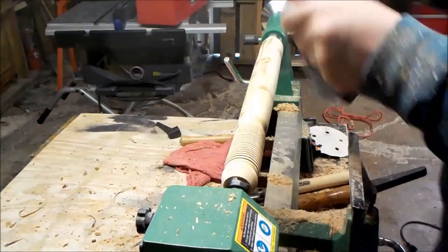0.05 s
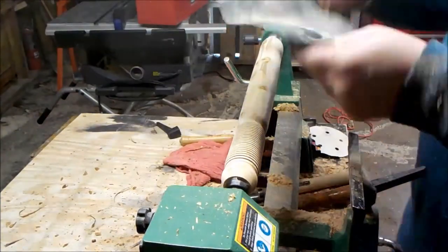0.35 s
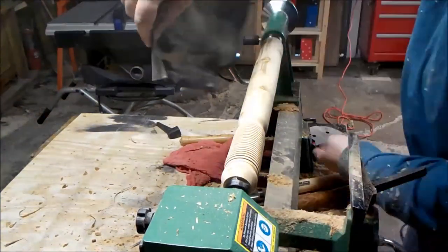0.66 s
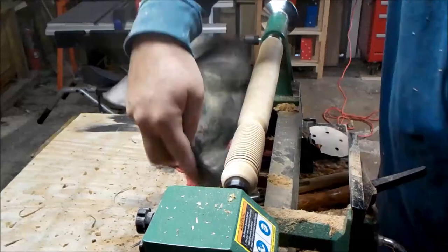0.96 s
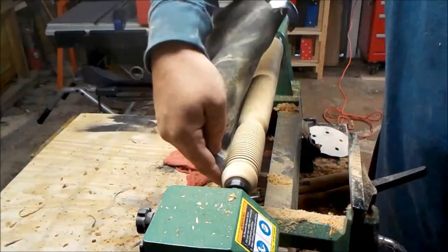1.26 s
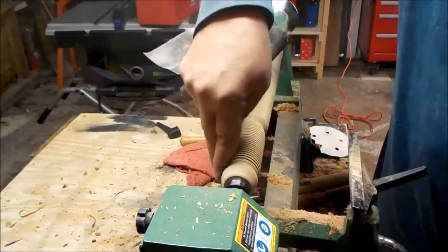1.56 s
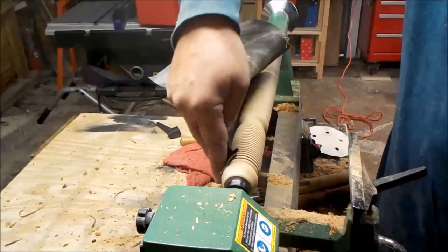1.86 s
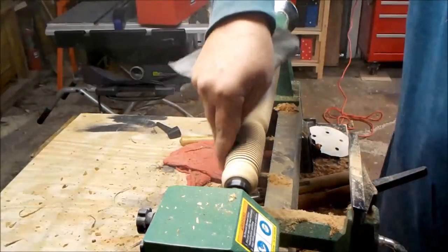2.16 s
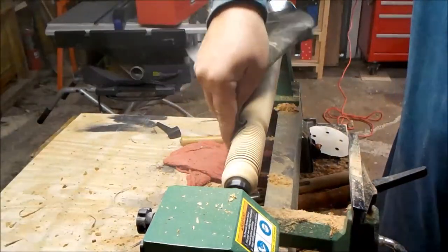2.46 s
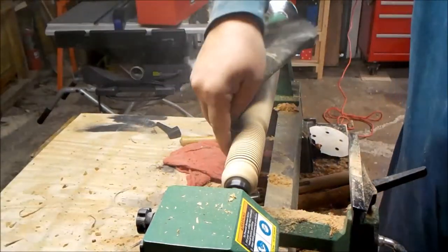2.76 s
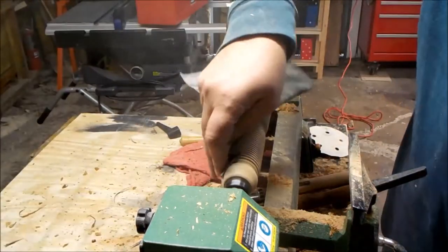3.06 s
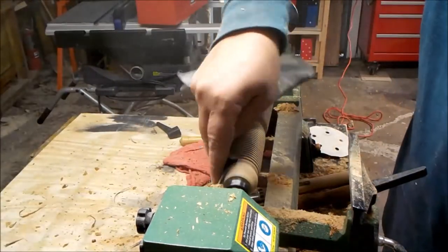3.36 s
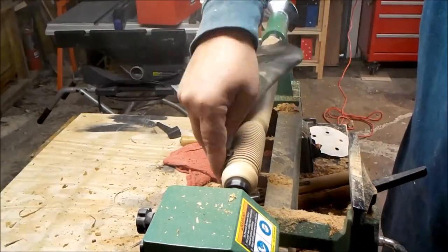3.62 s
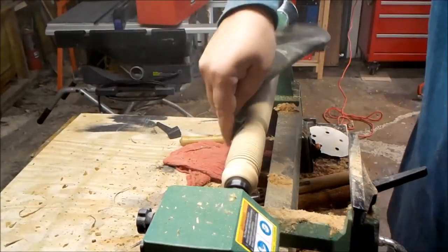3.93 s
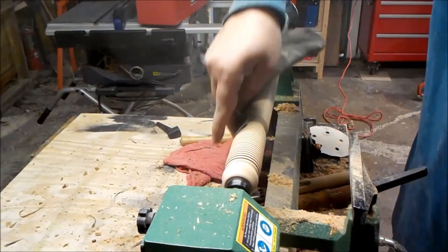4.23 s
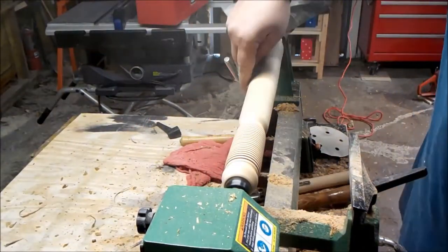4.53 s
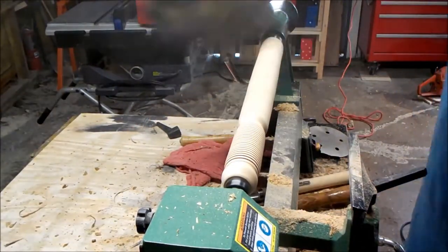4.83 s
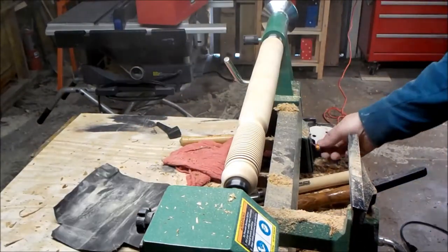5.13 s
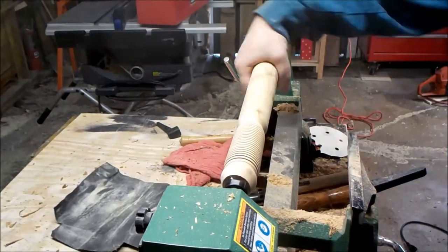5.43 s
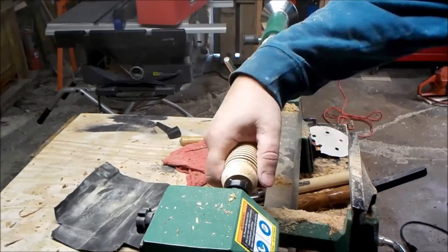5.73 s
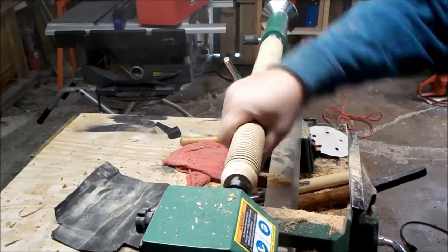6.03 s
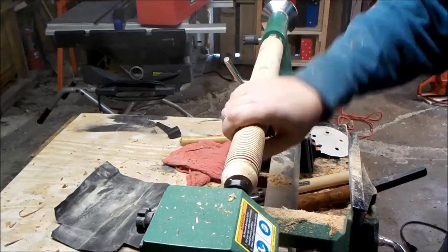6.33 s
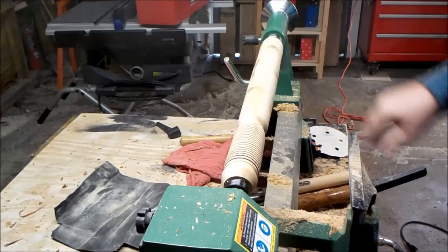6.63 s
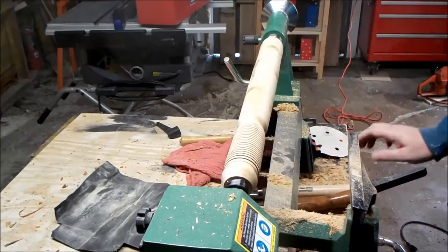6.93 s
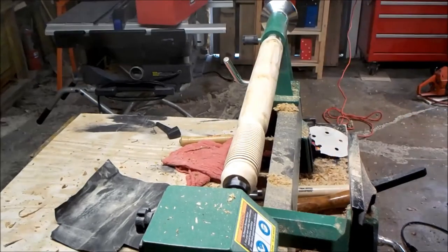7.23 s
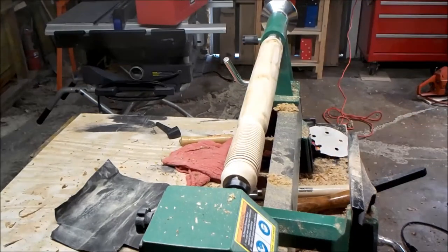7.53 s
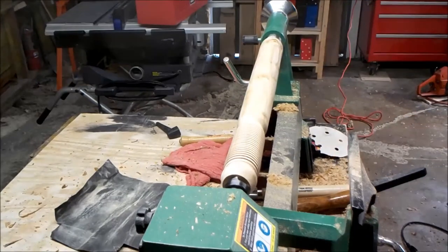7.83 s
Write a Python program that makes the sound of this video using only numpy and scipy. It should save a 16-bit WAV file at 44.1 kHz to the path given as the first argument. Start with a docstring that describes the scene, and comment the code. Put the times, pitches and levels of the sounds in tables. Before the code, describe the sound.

Sped-up workshop sanding: paper crackles, a thin lathe whine runs with pulsing sandpaper hiss and squeals, then winds down before a metallic clank.

```python
"""Sandpaper crackles as it is folded by a small wood lathe, heard through a microphone pair in a home
workshop. The work runs in fast motion, so everything lies two octaves high. A switch clacks, the motor
whines, and the paper hisses on the spinning wood and makes it sing. The lathe coasts to rest, a hand
strokes the work and a steel part clanks; then the quiet room fades in at natural pace."""
import sys
import numpy as np
from scipy import signal
from scipy.fft import rfft, irfft, next_fast_len
from scipy.io import wavfile

SR = 44100
rng = np.random.default_rng(int(sys.argv[2]) if len(sys.argv) > 2 else 0)


def to_wav(s):
    """Save 16-bit WAV."""
    ch = np.atleast_2d(s).T  # columns
    pcm = np.round(np.clip(ch, -1, 1) * 32767)  # PCM
    wavfile.write(sys.argv[1], SR, pcm.astype(np.int16))


N = 356311
TIME = np.arange(N) / SR

# Times and frequencies are as heard at the microphones, fast motion included.
ON_S, OFF_S, RUN_UP_S, COAST_S = .818, 5.199, .10, 0.1876
BELT_HZ, ROTOR_HZ, SPINDLE_HZ = 19.2, 117.8, 33.66  # laps or turns a second at full speed
HUM_HZ, WHINE_HZ, EDGE_HZ = 480, 4015, 15830  # mains hum, rotor whine, top of the band

# Resonances of casting and spindle. Each row: frequency in Hz, width in Hz, lift in dB.
CASTING = [(1588, 19, 13), (1660, 27, 8.5), (2245, 33, 14), (2348, 45, 12), (2572, 63, 11),
           (3148, 29, 16.5), (3444, 140, 9.5), (3592, 59, 9.5), (4340, 140, 8), (5030, 43, 11),
           (5446, 80, 10.5), (5770, 22, 17), (6000, 64, 10), (6225, 99, 14), (6583, 45, 14),
           (6720, 92, 9.5), (7080, 100, 10), (7464, 49, 14.5), (7930, 130, 12.5), (8664, 35, 13.5)]
# Tone of a dry tick or crack. Each row: frequency in Hz, relative level in dB.
TICK_COLOUR = [(100, -59), (500, -39.5), (1700, 0.5), (6000, 13), (8600, 5), (9800, -14), (15500, -3.5)]


def amp(db):
    """Decibels to gain."""
    return 10 ** (np.asarray(db) / 20)


def unit(x):
    """Scales to rms 1."""
    return x / np.sqrt(np.mean(x ** 2) + 1e-20)


def colour(points, hz):
    """Gain of a spectrum whose rows give frequency in Hz and level in dB."""
    f, db = np.transpose(points)
    return amp(np.interp(np.log(hz + 1), np.log(f), db))


def shaped(x, points, band=(0, SR), modes=()):
    """Colours x with a spectrum and resonances; the result has rms 1 within the band."""
    size = next_fast_len(len(x))
    hz = np.fft.rfftfreq(size, 1 / SR)
    peaks = sum(amp(db) ** 2 / (1 + (2 * (hz - f) / width) ** 2) for f, width, db in modes)
    z = rfft(x, size) * colour(points, hz) * np.sqrt(1 + peaks)
    power = 2 * np.sum(abs(z[(hz >= band[0]) & (hz <= band[1])]) ** 2) / size ** 2
    return irfft(z / np.sqrt(power), size)[:len(x)]


def wander(rate):
    """Random drift of rms 1, mostly slower than the rate in Hz."""
    size = next_fast_len(N)
    hz = np.fft.rfftfreq(size, 1 / SR)
    return unit(irfft(rfft(rng.standard_normal(size)) / (1 + (hz / rate) ** 2), size)[:N])


def follow(rows):
    """A curve over time, read at every sample."""
    return np.interp(TIME, *np.transpose(rows))


def swells(rows):
    """Soft bumps of gain. Each row: middle in seconds, level in dB, length in seconds."""
    bumps = (amp(db) * np.exp(-np.minimum((2 * (TIME - s) / length) ** 2, 50)) for s, db, length in rows)
    return np.sqrt(sum(bump ** 2 for bump in bumps))


def spin(turns):
    """A unit phasor that makes the given turns from a random start."""
    return np.exp(2j * np.pi * (turns + rng.random()))


def add(mix, s, sound):
    """Mixes a sound in at s seconds."""
    part = mix[max(round(s * SR), 0):][:len(sound)]
    part += sound[:len(part)]


def grit(per_s, spread_db):
    """Tiny impacts of uneven size."""
    size = amp(spread_db * np.minimum(rng.exponential(1, N), 4))
    return unit(rng.standard_normal(N) * size * (rng.random(N) < per_s / SR))


def snaps(rows, points, crack_t60, tail_db, tail_t60, modes=()):
    """Short cracks with the workshop's diffuse tail. Each row: start in seconds, level in dB."""
    out, t = np.zeros(N), np.arange(SR // 5) / SR
    decay = amp(-60 * t / crack_t60) + amp(tail_db - 60 * t / tail_t60)
    for s, db in rows:
        add(out, s, amp(db) * decay * rng.standard_normal(len(t)))
    return np.std(out) * shaped(out, points, modes=modes)


def spread(x, points, side_db, balance_db, t60):
    """Reflections from bench and walls reach the two microphones with opposite signs."""
    t = np.arange(SR // 2) / SR
    echoes = rng.standard_normal(len(t)) * amp(-60 * t / t60)
    reflected = signal.oaconvolve(x, echoes / np.linalg.norm(echoes))
    size = next_fast_len(len(reflected))
    spectrum = rfft(reflected, size) * colour(points, np.fft.rfftfreq(size, 1 / SR))
    side = amp(side_db) * irfft(spectrum, size)[:N]
    return np.array([(x + side) * amp(balance_db / 2), (x - side) * amp(-balance_db / 2)])


def fast_room():
    """The workshop's room tone, a thin hiss in fast motion."""
    # Tone of the air. Each row: frequency in Hz, relative level in dB.
    air_colour = [(130, -43.5), (260, -23), (1030, -10.5), (2500, -1), (4260, -0.5), (7600, -5),
                  (8640, -13), (9800, -29.5), (10700, -22), (12200, -25.5), (15800, -19)]
    return amp(-64.5) * shaped(rng.standard_normal(N), air_colour)


def natural_room(fade_in_s=7.17, fade_length_s=0.22):
    """Room tone at natural pace fades in with a faint drone, soft shuffling and a few clinks."""
    # Tone of the air and of small movements. Each row: frequency in Hz, relative level in dB.
    air_colour = [(50, -24), (250, -12), (370, -3), (900, -1), (1230, -1), (1430, 0.5), (1680, 0),
                  (2050, -5.5), (2450, -28), (4800, -11.5), (7100, -17.5), (8000, -52), (9000, -22),
                  (15500, -14)]
    movement_colour = [(100, -28), (350, 7), (1000, 0), (1700, 9.5), (2200, 4.5), (2800, 0), (3200, -11),
                       (4000, -5), (8000, -30)]
    # A sleeve or shoe shuffles. Each row: middle in seconds, level in dB, length in seconds.
    shuffles = [(7.68, -58.5, 0.047), (7.81, -61, 0.051), (7.88, -64, 0.04), (7.985, -62.5, 0.03),
                (8.055, -64.5, 0.038)]
    # Something loose clinks. Each row: start in seconds, level in dB.
    clink_hits = [(7.654, -54), (7.676, -52), (7.711, -56)]
    air = shaped(rng.standard_normal(N), air_colour, band=(200, 2200), modes=[(1230, 36, 8.7)])
    drone = amp(-24.0) * np.sin(2 * np.pi * 161 * TIME)
    scuff = shaped(grit(per_s=2500, spread_db=3.0), movement_colour, modes=[(1704, 59, 12.7)])
    clinks = snaps(clink_hits, movement_colour, crack_t60=0.033, tail_db=-15, tail_t60=0.18,
                   modes=[(1680, 52, 11)])
    fade = np.clip((TIME - fade_in_s) / fade_length_s, 0, 1) ** 3
    return fade * (amp(-63.5) * (air + drone) + swells(shuffles) * scuff + clinks)


def knock(s, db, hz):
    """A crack over the dull thud of the struck body."""
    crack = snaps([(s, db + 0.5)], TICK_COLOUR, crack_t60=0.026, tail_db=-4.5, tail_t60=0.17,
                  modes=[(hz, hz / 2, 12)])
    body = [(hz / 30, -30), (hz / 8, -40), (hz / 2, -11), (hz, 0), (hz * 3, -22)]
    thud = snaps([(s, db - 20.5)], body, crack_t60=0.029, tail_db=-7.5, tail_t60=0.21)
    return crack + thud


def handling():
    """Hands at the bench: paper and skin rustle in clumps of grains, creases snap, the switch clacks."""
    # The sheet flexes; later the hand slides on wood and tool rest.
    # Each row: middle in seconds, level in dB, length in seconds.
    rustles = [(.022, -50, 0.012), (.04, -56.5, 0.045), (.115, -56.5, 0.041), (.184, -53, 0.017),
               (.208, -55, 0.024), (.26, -62.5, 0.08), (.318, -56.5, 0.022), (.367, -60, 0.014),
               (.49, -53.5, 0.03), (.531, -59, 0.02), (5.925, -60, .02), (6.05, -62.5, 0.041),
               (6.738, -59.5, 0.012), (6.8, -57, 0.013), (7.08, -59, 0.023), (7.156, -54.5, 0.044)]
    # Paper crackles and light taps, then dry skin catching on the turned grooves.
    # Each row: start in seconds, level in dB.
    tick_hits = [(.0165, -37), (.162, -41), (.1805, -47), (.186, -48), (.2005, -38), (.364, -49), (.4, -52),
                 (.4205, -46.5), (.532, -44), (.586, -45), (.739, -49.5), (.792, -50.5), (.9485, -22.5),
                 (6.102, -45), (7.0915, -40)]
    skin_hits = [(5.7159, -60), (5.7274, -66), (5.7813, -64), (6.1574, -59), (6.2233, -61.5),
                 (6.2854, -62.5)]
    # Tone of the rustle and of the catching skin. Each row: frequency in Hz, relative level in dB.
    rustle_colour = [(100, -53.5), (500, -30), (1100, -11.5), (1900, -9), (3700, -2.5), (7800, -2),
                     (9700, -21.5), (10900, -16.5), (12100, -23), (15800, -13)]
    skin_colour = [(2000, -67), (6000, -2), (6600, 7.5), (11000, -8.5), (12000, -13)]
    # The sheet flapping, the switch, paper meeting wood, knocks on bench and tool rest.
    # Each row: start in seconds, relative level in dB, body resonance in Hz.
    knock_hits = [(0.4737, -51, 3300), (0.8182, -38.5, 1940), (.949, -38.5, 3240), (4.9982, -39, 1130),
                  (5.1911, -38, 2200), (7.089, -49, 1080), (7.169, -62, 1045)]
    grains = grit(per_s=14000, spread_db=.7) * amp(1.4 * wander(90))
    effort = swells(rustles) + amp(-68.0) * (TIME < ON_S)
    rustle = effort * shaped(grains, rustle_colour, band=(2000, 9000), modes=[(4050, 340, 1.0)])
    ticks = snaps(tick_hits, TICK_COLOUR, crack_t60=.006, tail_db=-16, tail_t60=.07)
    catches = snaps(skin_hits, skin_colour, crack_t60=0.015, tail_db=-1.5, tail_t60=0.17)
    knocks = sum(knock(*row) for row in knock_hits)
    return rustle + ticks + catches + knocks


def clank(start_s=6.882):
    """A steel part hits its stop: a hard crack and briefly ringing modes."""
    # Modes of the steel. Each row: frequency in Hz, relative level in dB, seconds to fall 60 dB.
    steel = [(1561, -11, 0.088), (1658, -1, 0.06), (1782, -9.5, .11), (2760, -1.5, 0.06),
             (4680, -6.5, 0.07), (5376, -4, .05), (5650, 3, 0.054), (5726, 5, 0.067), (5900, -4, 0.093),
             (7300, -8, .069), (8500, -3, 0.06)]
    # Tone of the crack. Each row: frequency in Hz, relative level in dB.
    crack_colour = [(200, -43), (900, -19), (1500, 3), (8500, 1), (9900, -20), (15600, -22)]
    ringing, t = np.zeros(N), np.arange(SR // 5) / SR
    modes = sum(amp(db - 60 * t / t60) * np.sin(2 * np.pi * hz * t) for hz, db, t60 in steel)
    add(ringing, start_s, amp(-31) * modes * (1 - np.exp(-t / 0.0011)))
    return ringing + snaps([(start_s, -38)], crack_colour, crack_t60=0.016, tail_db=-1, tail_t60=0.11)


def spark():
    """The switch contacts spark thinly as they open."""
    spark_colour = [(1000, -50), (11500, -17), (13500, 12)]
    return snaps([(5.191, -30.5)], spark_colour, crack_t60=0.008, tail_db=-10, tail_t60=0.06)


def speed():
    """Share of full speed: a quick run-up, then a coast to rest."""
    return np.clip((TIME - ON_S) / RUN_UP_S, 0, 1) * np.clip(1 - (TIME - OFF_S) / COAST_S, 0, 1)


def running_time():
    """Time as the shafts count it: the motor sags as the paper is pressed on."""
    # The rotor whine under load. Each row: time in seconds, pitch at full speed in Hz.
    pitch = [(1.05, 4023), (1.8, 4016), (2.3, 4006), (2.92, 4012), (3.2, 4022), (3.7, 4010), (4.6, 4010),
             (4.87, 4026)]
    return np.cumsum(follow(pitch) / WHINE_HZ * speed() * (1 + 0.0002 * wander(25))) / SR


def bearings(clock):
    """Wavering tones fall as the lathe coasts, while a rattle in the casting beats with the slowing rotor."""
    # Bearings and pulleys at full speed. Each row: frequency in Hz, level in dB.
    partials = [(1075, -83), (1600, -77.5), (2795, -63), (2957, -61), (3746, -57.5), (4238, -56.5),
                (4345, -54.5), (4715, -55.5), (6020, -58.5), (7290, -56)]
    # Tone of the rattle. Each row: frequency in Hz, relative level in dB.
    rattle_colour = [(300, -50), (1250, -7), (2000, -10), (2350, 5), (2900, -6), (5000, -17)]
    tones = sum(amp(db) * (1 + .3 * wander(6.6)) * spin(hz * clock + .08 * wander(6)).real
                for hz, db in partials)
    knocking = 1 + .4 * spin(ROTOR_HZ * clock).real
    rattle = knocking * shaped(rng.standard_normal(N), rattle_colour, modes=CASTING)
    return np.sqrt(2) * speed() ** 4.5 * tones + swells([(5.3, -56.5, 0.09)]) * rattle


def belt_rasp():
    """The belt rasps while it pulls the spindle up to speed."""
    # Tone of the rasp. Each row: frequency in Hz, relative level in dB.
    rasp_colour = [(300, -61), (1500, -27.5), (2250, 0), (3000, -5.5), (3700, 2), (6000, -11.5),
                   (10000, -34)]
    return swells([(.887, -36.5, 0.065)]) * shaped(rng.standard_normal(N), rasp_colour)


def surface(clock, hz, size=16384):
    """Roughness on a turning part: the same pattern comes round with every turn."""
    count = int(EDGE_HZ / hz)
    orders = amp(2 * rng.standard_normal(count)) * np.exp(2j * np.pi * rng.random(count))
    one_turn = unit(irfft(np.r_[0, orders], size))
    turns = hz * clock + .0006 * wander(4)
    return np.interp(turns % 1 * size, np.arange(size), one_turn)


def rubbing(clock, spindle_share=.42, belt_share=.27):
    """Friction of the turning parts: mostly a repeating churn, with a little fresh hiss."""
    spindle = np.sqrt(spindle_share) * surface(clock, SPINDLE_HZ)
    belt = np.sqrt(belt_share) * surface(clock, BELT_HZ)
    hiss = np.sqrt(1 - spindle_share - belt_share) * rng.standard_normal(N)
    return np.sqrt(speed()) * (spindle + belt) + hiss


def ring(friction, hz, width, steady):
    """Friction singing in one narrow resonance; steady (0-1) evens out its loudness."""
    pole = np.exp(-np.pi * width / SR + 2j * np.pi * hz / SR)
    z = signal.lfilter([1], np.poly([pole, pole]), friction)
    return unit(z.real / (abs(z) + 1e-9) ** steady)


def hand_strokes(stroke_s=0.3677, turn_s=3.585, squeal_s=0.15):
    """Level in dB of the wood's singing: it peaks each time the hand turns in its even to and fro."""
    # The paper grabs and the wood squeals. Each row: middle in seconds, level in dB.
    squeals = [(1.0, -45.5), (1.23, -41), (1.44, -43.5), (2.993, -42), (3.25, -42.5), (3.589, -40.5),
               (3.98, -43), (4.86, -44), (5.06, -43.5)]
    swing = np.cos(2 * np.pi * (TIME - turn_s) / stroke_s)
    grabs = swells([(s, db, squeal_s) for s, db in squeals])
    return 20 * np.log10(amp(-50 + 6.5 * swing) + grabs)


def casting_and_wood(clock):
    """Friction rings the casting, throbbing with rotor and hum, and makes the wood sing under the paper."""
    # Broad tone of the running lathe. Each row: frequency in Hz, relative level in dB.
    lathe_colour = [(55, -61.5), (100, -72), (160, -72.5), (230, -64), (1000, -26), (2000, -17),
                    (3000, -9.5), (4200, 1.5), (5300, -3.5), (8000, -7.5), (8800, -14.5), (9800, -27),
                    (10900, -13.5), (12100, -25)]
    # Resonances of the wood. Each row: frequency in Hz, width in Hz, relative level in dB.
    wood_modes = [(2925, 90, -14.5), (4720, 130, -6), (6004, 180, -8.5), (7306, 110, -10.5)]
    throb = 1 + 0.11 * spin(ROTOR_HZ * clock).real + 0.072 * np.cos(2 * np.pi * HUM_HZ * TIME)
    rattle = shaped(rubbing(clock) * throb, lathe_colour, band=(5200, 8500), modes=CASTING)
    stroke_db = hand_strokes()
    rattle *= amp(-44 + 0.12 * (stroke_db - np.mean(stroke_db)) + 0.78 * wander(10.0))
    friction = rubbing(clock)
    wood = sum(amp(db) * ring(friction, hz, width, steady=0.3) for hz, width, db in wood_modes)
    return speed() ** 1.2 * (rattle + amp(stroke_db) * wood)


def sanding(clock):
    """Grit scratches the wood, harder once in every turn of the spindle."""
    # Paper pressed on the wood. Each row: time in seconds, level of the topmost hiss in dB.
    pressure = [(1.0, -62), (1.26, -55.5), (1.58, -59), (2.05, -55.5), (2.75, -57), (2.84, -55.5),
                (2.92, -57), (3.4, -59), (3.87, -56), (4.04, -60.5), (4.79, -55), (4.82, -62), (5.14, -61)]
    # Tone of the hiss. Each row: frequency in Hz, relative level in dB.
    hiss_colour = [(200, -65.5), (4000, 5.5), (8000, 3.5), (9800, -10.5), (11000, -1.5), (12100, -10.5),
                   (13400, 3.5), (15700, 4)]
    scratch = grit(per_s=12000, spread_db=2.0) * (1 + .2 * spin(SPINDLE_HZ * clock).real)
    return amp(follow(pressure)) * speed() ** 4 * shaped(scratch, hiss_colour, band=(12800, 15600))


def motor(clock):
    """The mains hum holds its pitch; rotor slots passing the field whine with sidebands one hum apart."""
    # Magnetic hum. Each row: multiple of the hum frequency, level in dB.
    harmonics = [(1, -87.5), (2, -72), (4, -69), (5, -61), (6, -59)]
    # Partials of the whine. Each row: offset in multiples of the hum, gain in dB, flutter depth.
    sidebands = [(-1, 2.3, 0.19), (0, 0.8, 0.06), (1, 1, 0.09), (2, -9, .06)]
    # The lower sideband, weaker under load, and the other partials.
    # Each row: time in seconds, relative level in dB.
    lower_levels = [(0.94, -43.5), (1.15, -43.5), (1.9, -47), (2.3, -55.5), (2.6, -49), (2.92, -50.5),
                    (3.2, -44.5), (3.75, -49), (4.38, -48), (4.55, -52), (4.8, -42.5), (5.16, -42)]
    upper_levels = [(1.85, -45), (2.3, -48.5), (2.75, -45.5), (3.7, -46.5), (4.87, -48)]
    powered = speed() ** 2 * amp(-60 * np.maximum(TIME - OFF_S, 0) / 0.042)
    field = HUM_HZ * TIME
    hum = sum(amp(db) * (1 + 0.18 * wander(33)) * spin(k * field).real for k, db in harmonics)
    # each turn of spindle and rotor tugs at the whine, most audibly when the whine is weak
    turn = spin(SPINDLE_HZ * clock)
    flutter = turn + 0.45 * turn.conj() + 0.5 * spin(ROTOR_HZ * clock)
    whine = 0
    for offset, db, depth in sidebands:
        level = amp(follow(lower_levels if offset < 0 else upper_levels))
        tone = spin(WHINE_HZ * clock + offset * field)
        whine += amp(db) * (tone * (level + depth * np.mean(level) * flutter)).real
    # the whine only sings out close to full speed
    return np.sqrt(2) * powered * (hum + speed() ** 8 * whine)


def scene(fast_ends_s=7.19):
    """At the microphone pair: the fast-motion work, cut off sharply, then the room at natural pace."""
    # Sound that differs between the microphones, from the bench and from the room around it.
    # Each row: frequency in Hz, relative level in dB.
    bench_side = [(250, -22), (1000, -31), (2400, -31.5), (4500, -14.5), (8000, -4.5), (13000, -7.5)]
    room_side = [(250, -6), (900, -10.5), (2000, -6), (6000, -3), (9000, -4.5), (15000, -4)]
    clock = running_time()
    lathe = spark() + motor(clock) + bearings(clock)
    lathe += casting_and_wood(clock) + belt_rasp() + sanding(clock)
    room = fast_room()
    fast = spread(lathe, bench_side, side_db=-7.0, balance_db=-0.74, t60=.15)
    fast += spread(handling(), bench_side, side_db=-2.5, balance_db=0.0, t60=.12)
    fast += spread(room, room_side, side_db=-6.0, balance_db=-0.6, t60=.12)
    fast += spread(clank(), bench_side, side_db=-5.0, balance_db=-1.5, t60=0.043)
    fast *= amp(-60 * np.maximum(TIME - fast_ends_s, 0) / 0.026)
    natural = spread(natural_room(), room_side, side_db=0.5, balance_db=-0.5, t60=0.16)
    faint_hiss = amp(-100.5) * rng.standard_normal((2, N))
    return fast + natural + faint_hiss


def record(dry):
    """The recorder's band limit cuts the highest treble."""
    lowpass = signal.firwin(801, EDGE_HZ, window=("kaiser", 8), fs=SR)
    return signal.oaconvolve(dry, lowpass[None], "same")


dry = scene()
out = record(dry)
to_wav(out)
```